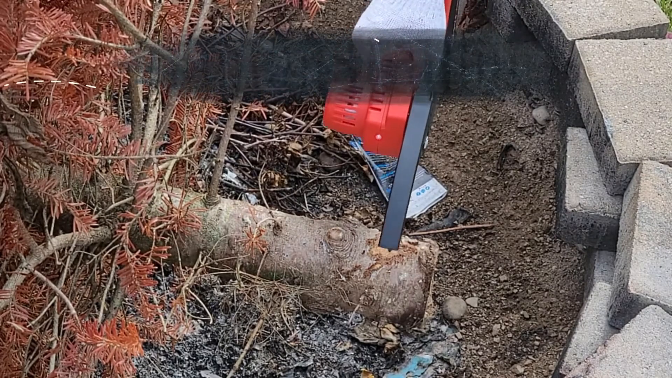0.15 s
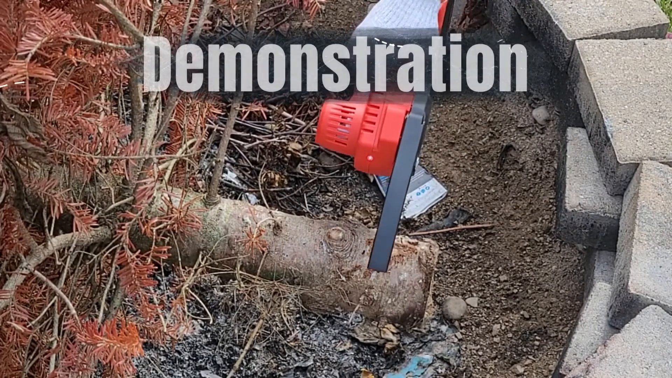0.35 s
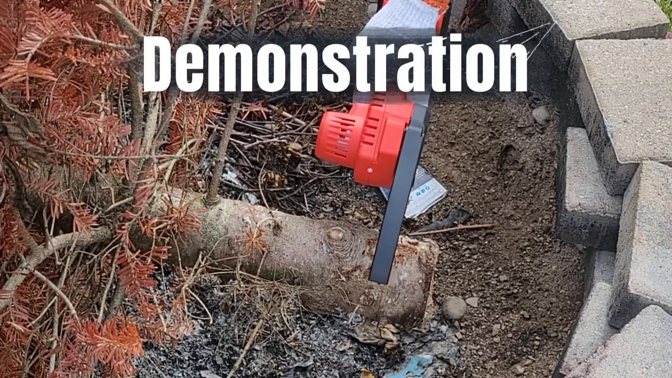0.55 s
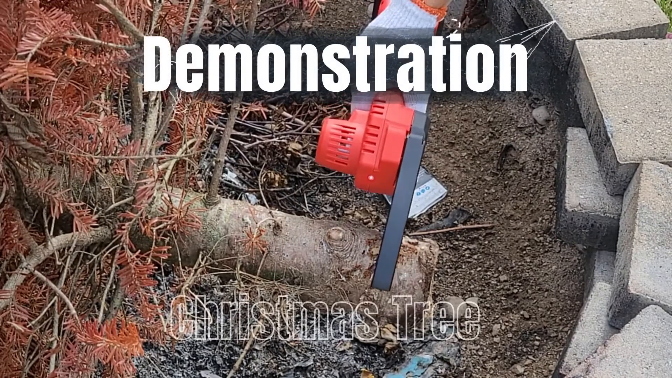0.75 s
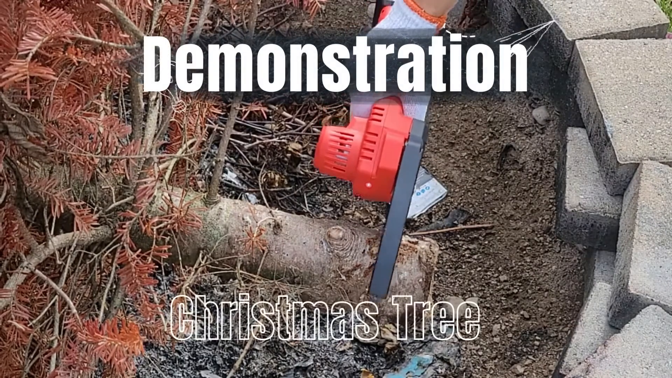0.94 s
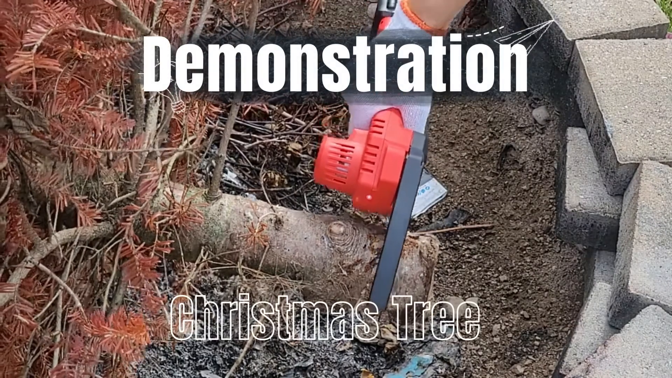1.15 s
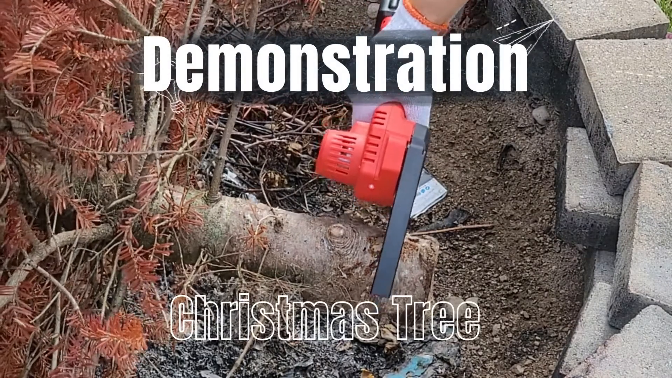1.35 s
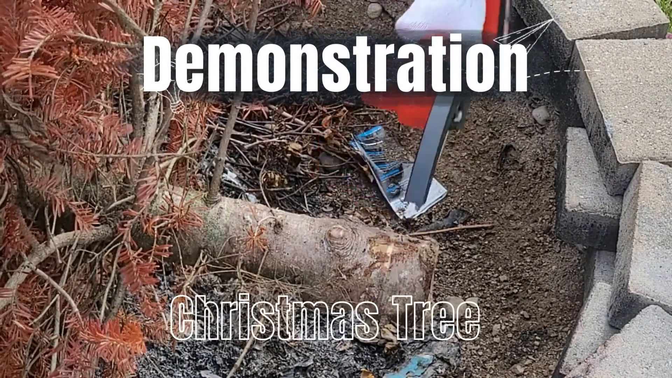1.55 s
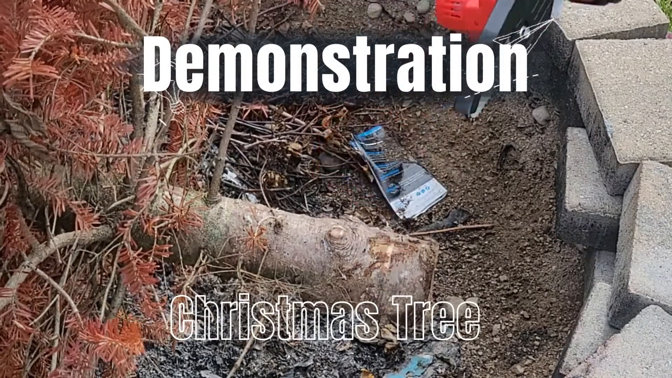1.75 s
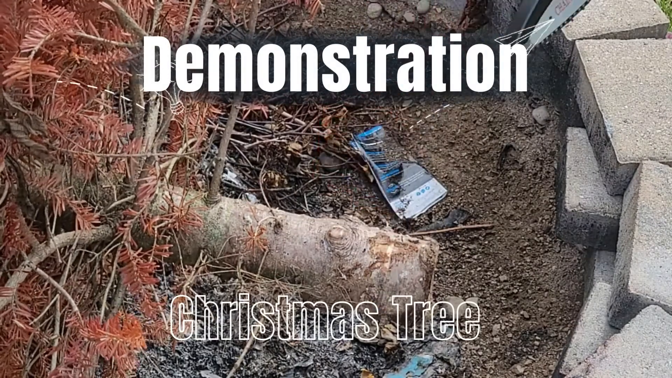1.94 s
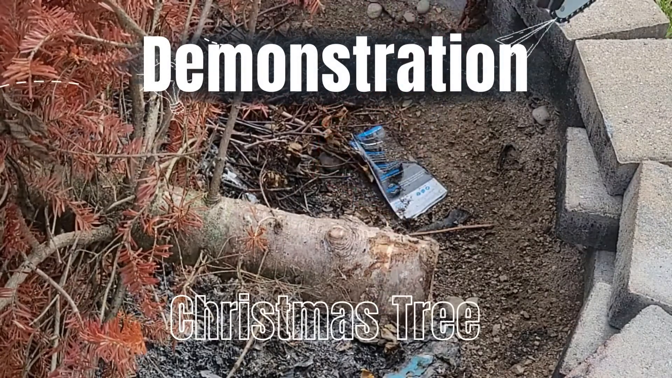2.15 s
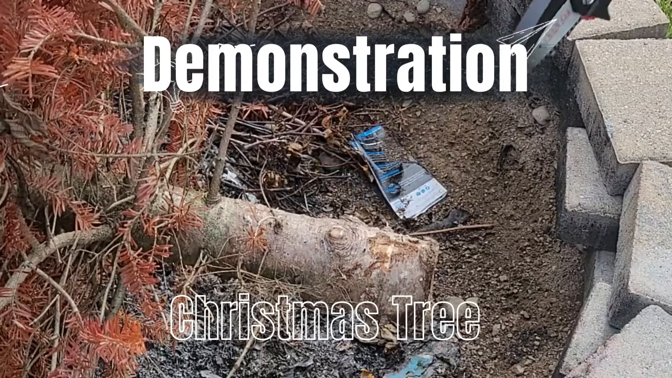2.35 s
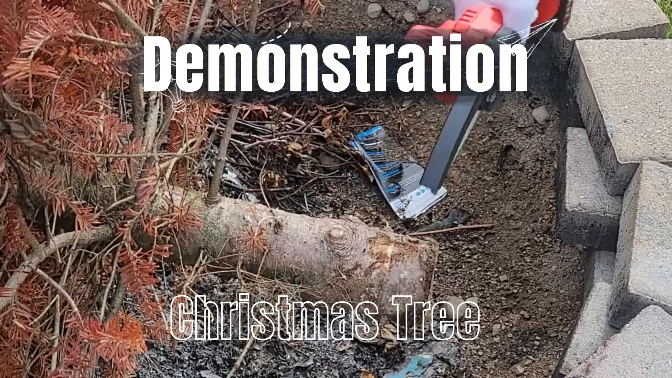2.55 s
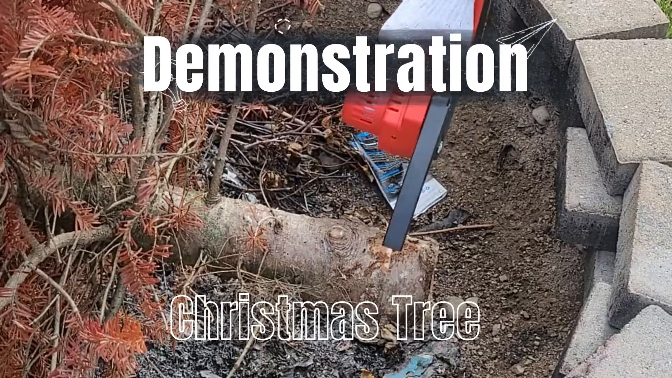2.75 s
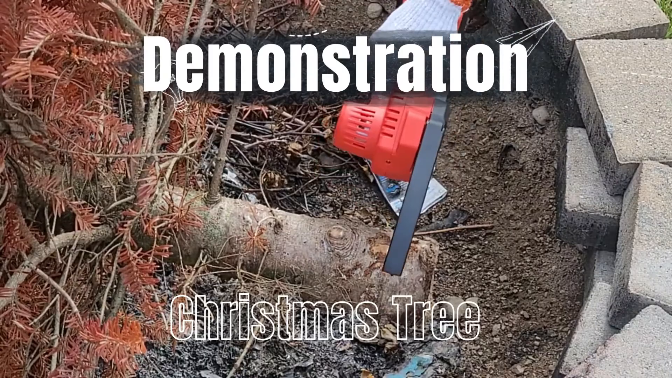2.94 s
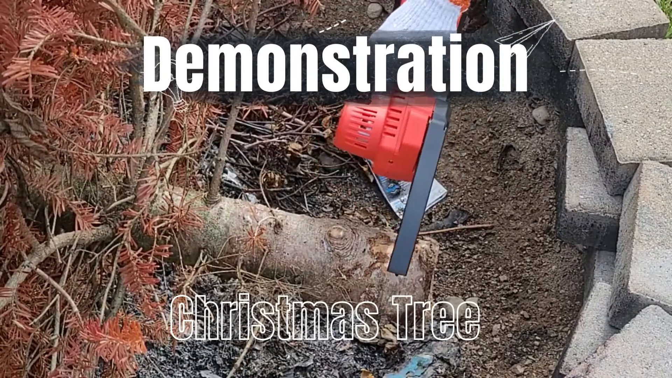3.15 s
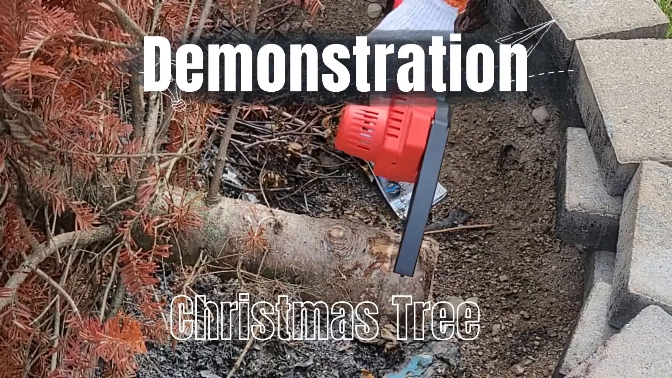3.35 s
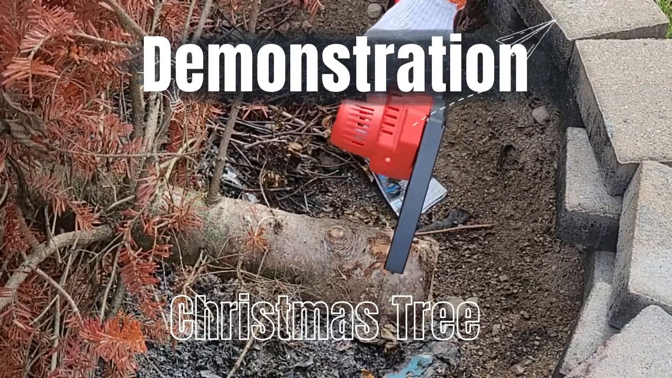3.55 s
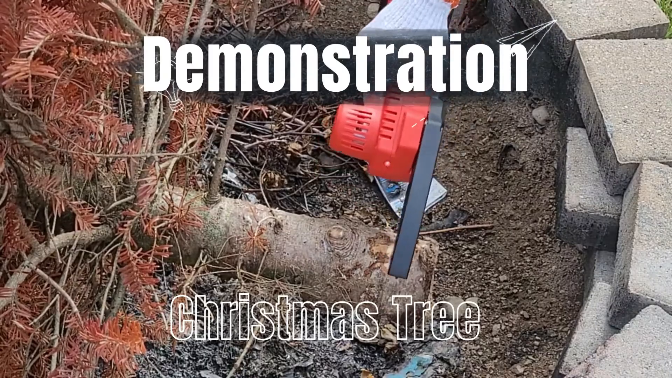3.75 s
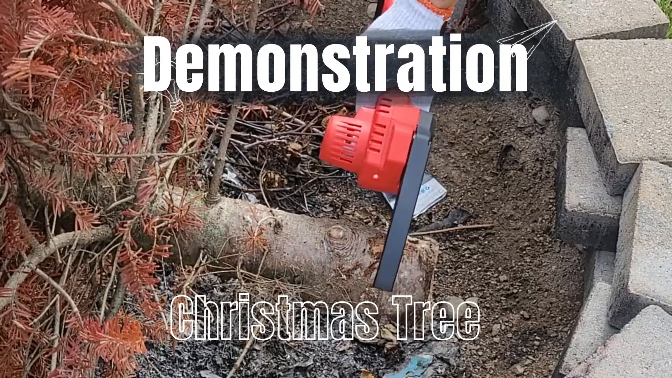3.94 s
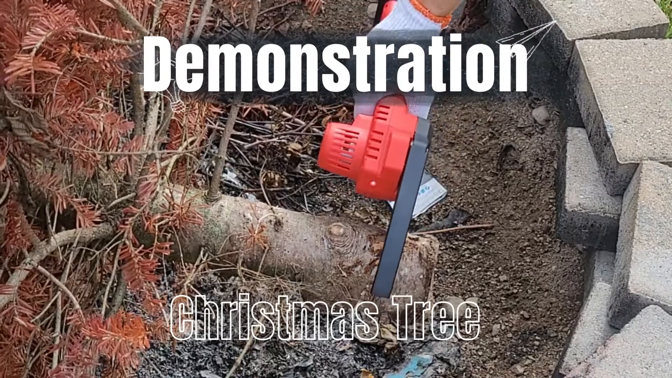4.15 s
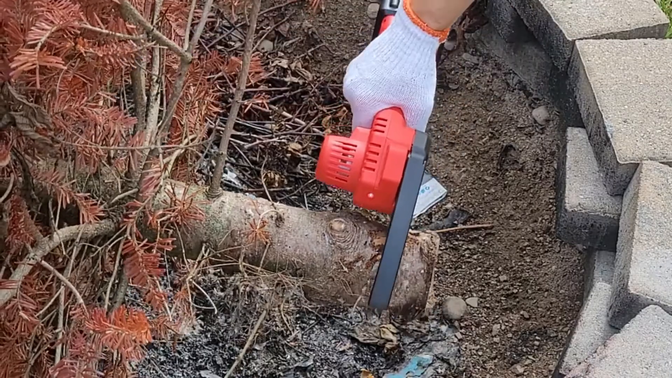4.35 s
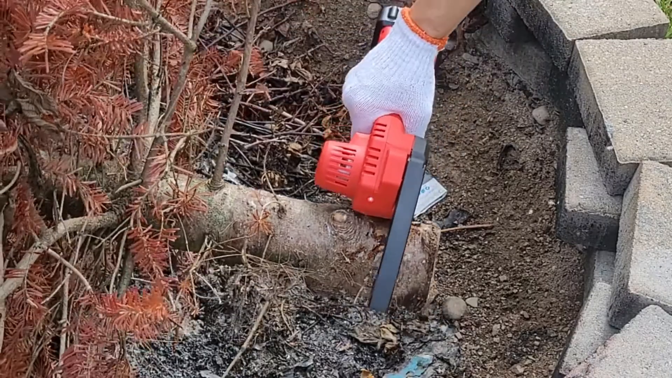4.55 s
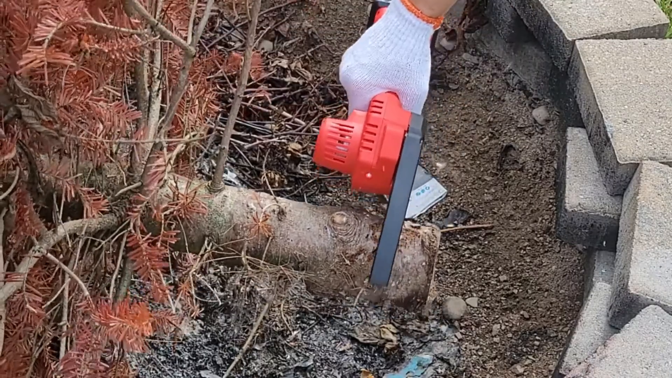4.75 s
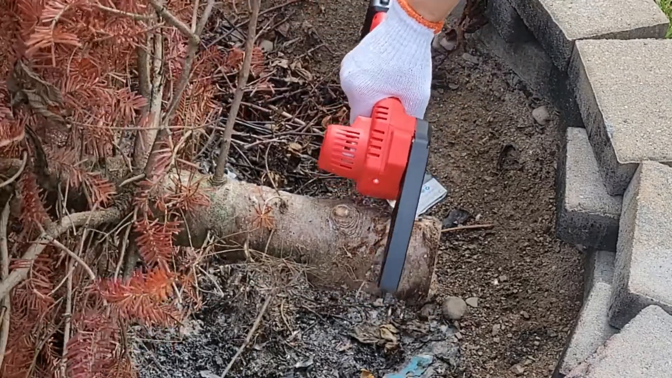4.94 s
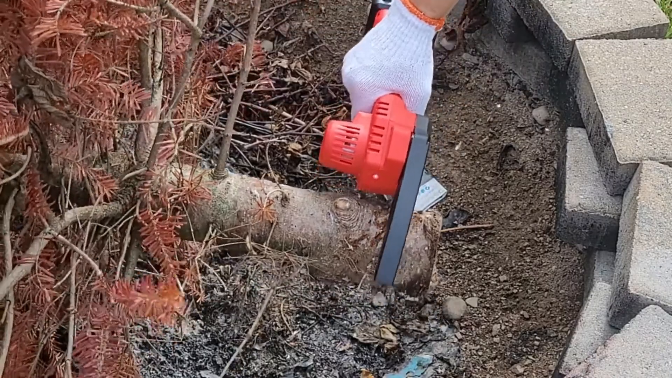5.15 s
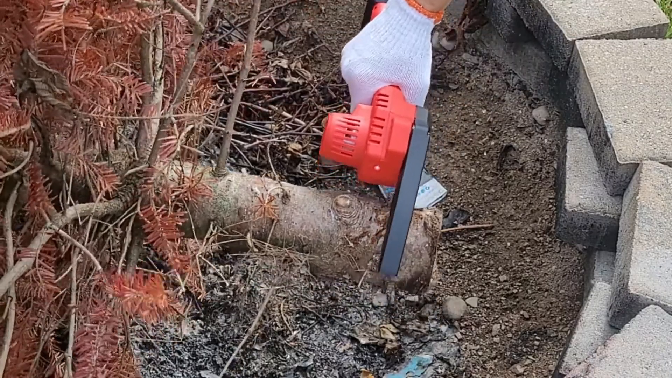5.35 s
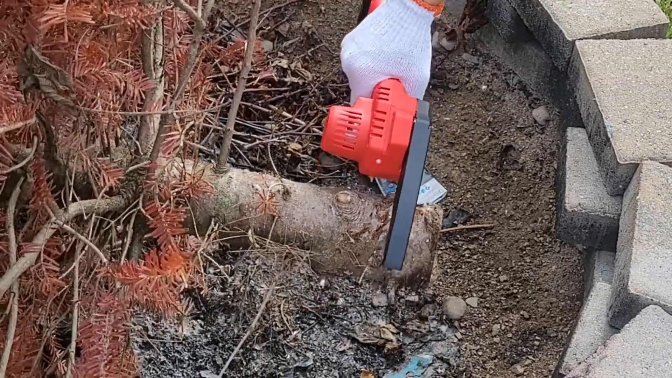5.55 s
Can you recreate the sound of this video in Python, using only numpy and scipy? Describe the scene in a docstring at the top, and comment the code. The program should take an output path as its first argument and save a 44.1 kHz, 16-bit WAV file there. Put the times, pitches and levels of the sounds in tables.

```python
"""A battery chainsaw, already running close by in a quiet garden, brushes the bark of a small dead trunk.
Its trigger is let go and the chain coasts to a stop: whine from sine tones, clatter and rattle from noise bursts.
In the pause bending sine whistles make birdsong, short noise bursts knock in the hand, the glove rubs,
and a far rumble of filtered noise swells once.
Then the chain spins up again and bites into the wood, rasping and sagging in pitch under the load."""
import sys
import numpy as np
from scipy import signal
from scipy.fft import rfft, irfft, next_fast_len
from scipy.io import wavfile
from scipy.ndimage import uniform_filter1d

SR = 44100
rng = np.random.default_rng(int(sys.argv[2]) if len(sys.argv) > 2 else 0)


def pcm_store(signal):
    """Save signal as 16-bit PCM."""
    levels = np.round(np.clip(np.atleast_2d(signal), -1, 1) * 32767)
    wavfile.write(sys.argv[1], SR, levels.astype(np.int16).T)


N = 246519

FREE_SPEED = 456.2   # the unloaded chain (links over the sprocket per s)
SPROCKET_TEETH = 7


def from_db(db):
    """Turn decibels into a gain."""
    return 10 ** (np.asarray(db) / 20)


def rms_one(x):
    """Scale to an average power of 1."""
    return x / np.sqrt(np.mean(x ** 2) + 1e-20)


def at_hz(points, hz):
    """Read a curve between its points, on a log-frequency axis."""
    point_hz, value = np.transpose(points)
    return np.interp(np.log(hz + 1e-3), np.log(point_hz), value)


def colour(x, gain_at):
    """Filter by a gain that depends on frequency."""
    size = next_fast_len(N + 4096)
    hz = np.arange(size // 2 + 1) * SR / size
    return irfft(rfft(x, size) * gain_at(hz), size)[..., :N]


def body(x, spectrum):
    """Shape a sound by an object's spectrum, which falls away beyond its ends; rms 1."""
    low, high = spectrum[0][0], spectrum[-1][0]

    def gain_at(hz):
        ends = np.minimum(hz / low, 1) ** 2 * np.minimum(high / (hz + 1), 1) ** 2
        return from_db(at_hz(spectrum, hz)) * ends

    return rms_one(colour(x, gain_at))


def drift(rate):
    """Slow random wandering with a spread of 1; a higher rate (Hz) wanders faster."""
    at = np.arange(N // 32 + 2) * 32   # drawn at every 32nd sample
    hz = np.arange(len(at) // 2 + 1) * SR / at[-1]
    smoothing = 1 / (1 + (hz / rate) ** 2)
    slow = irfft(rfft(rng.standard_normal(len(at))) * smoothing, len(at))
    return np.interp(np.arange(N), at, rms_one(slow))


def swell(middle_s, width_s):
    """A smooth rise and fall of height 1."""
    return np.exp(-((np.arange(N) / SR - middle_s) / width_s) ** 2)


def add(track, s, sound):
    """Mix a sound into a track at a time in seconds."""
    start = round(s * SR)
    track[..., start:start + sound.shape[-1]] += sound[..., :N - start]


def garden(x, t60):
    """Dying scatter from walls, fences and leaves, different on each side."""
    t = np.arange(SR // 2) / SR
    echoes = rng.standard_normal((2, len(t))) * from_db(-60 * t / t60)
    echoes /= np.linalg.norm(echoes, axis=1, keepdims=True)
    return signal.fftconvolve(np.atleast_2d(x), echoes, axes=1)[:, :N]


def two_ports(mid, side):
    """Parts of the saw radiate differently to each side, so left and right are less alike in some bands."""
    # how alike left and right are: hz, likeness (0-1)
    likeness = [(300, 0.95), (700, .95), (1400, .85), (3000, 0.77), (5000, 1), (6500, 0.1), (7800, 0),
                (9500, 0.6), (15000, .55)]

    def side_gain(hz):
        alike = np.clip(at_hz(likeness, hz), 0, 1)
        return np.sqrt((1 - alike) / (1 + alike))

    return mid + colour(side, side_gain) * [[1], [-1]]


def air():
    """Distant traffic as a low rumble, alike on both sides, with a faint diffuse hiss of still air."""
    # distant traffic and still air: hz, relative level (dB per Hz)
    air_spectrum = [(15, -34.5), (25, -8.5), (59, 1), (91, -1.5), (136, -6.5), (178, -20), (260, -18),
                    (313, -21), (1050, -35), (2770, -30), (4040, -30.5), (6730, -44.5), (7910, -52.5),
                    (9300, -40), (15500, -56)]
    mid, side = body(rng.standard_normal((2, N)), air_spectrum)
    side = colour(side, lambda hz: from_db(at_hz([(100, -15.5), (400, -8), (2000, 2)], hz)))
    still = mid + side * [[1], [-1]]
    rumble = colour(still, lambda hz: 1 / (1 + (hz / 700) ** 2))
    hiss = still - rumble
    rumble_db = -57 + 4 * swell(2.65, 0.49)   # the far rumble swells once
    return from_db(rumble_db + 1.2 * drift(5)) * rumble + from_db(-56.0) * hiss


def whistle(length, pitches_hz, db, waver):
    """A near sine that bends through three pitches, wavers a little and swells in the middle."""
    u = np.linspace(0, 1, int(length * SR))
    tremble = rms_one(uniform_filter1d(rng.standard_normal(SR // 2), size=60))[:len(u)]
    bend = np.polyfit([0, .5, 1], pitches_hz, 2)
    hz = np.polyval(bend, u) * (1 + waver * tremble)
    loudness = np.sqrt(2) * from_db(db) * np.sin(np.pi * u)
    return loudness * np.sin(2 * np.pi * np.cumsum(hz) / SR)


def birds(direct_db, echo_db, waver, lag_s):
    """Far whistles from the right, blurred by the garden, and nearer chips with a brief scatter."""
    # bird notes: start_s, length_s, start_hz, middle_hz, end_hz, level_db (before the mix)
    song_notes = [(1.743, .06, 1960, 2020, 1600, -62), (2.004, .094, 1830, 2085, 2050, -58),
                  (2.037, .11, 3050, 3350, 3150, -66), (2.077, 0.11, 2810, 2690, 2640, -64),
                  (2.525, 0.17, 5750, 5860, 5780, -63), (2.6, 0.172, 2760, 2560, 2600, -69),
                  (2.763, 0.063, 2010, 2600, 3300, -56), (2.803, 0.052, 3120, 3800, 4700, -49),
                  (2.832, 0.042, 1750, 2000, 2200, -57), (2.871, 0.029, 5400, 4080, 3200, -51),
                  (2.86, .05, 5300, 6450, 5800, -70), (2.867, 0.036, 2500, 2910, 3280, -57),
                  (2.94, 0.03, 4000, 3200, 2580, -59), (2.988, .06, 3180, 3800, 4400, -62.5),
                  (3.12, 0.054, 3200, 3800, 4470, -66), (3.174, 0.069, 2540, 2360, 1650, -65),
                  (3.27, .035, 2700, 2150, 1550, -71), (3.445, 0.026, 3400, 4300, 5200, -63),
                  (3.47, .022, 5400, 4720, 3900, -58), (3.492, 0.079, 2690, 3480, 5040, -55.5)]
    # a small bird's thin, high chips: start_s, level_db (before the mix)
    chip_notes = [(1.75, -58), (1.894, -67), (2.038, -68), (2.19, -66.5), (2.435, -63), (2.584, -55),
                  (3.017, -59), (3.148, -66), (3.292, -64), (3.445, -63)]
    # its softer, longer and lower notes: start_s, level_db (before the mix)
    seep_notes = [(2.052, -79), (2.61, -73.5), (2.8, -72), (2.99, -76)]
    chip_s, chip_hz = .022, 9740
    seep_s, seep_hz = 0.053, 9300
    rise_hz = 450   # each chip or seep rises by this much
    twitters_per_s, twitter_hz, twitter_s, twitter_db = 3.3, 2750, 0.03, -68.5

    song, chips = np.zeros((2, N))
    for s, length, *pitches_hz, db in song_notes:
        add(song, s, whistle(length, pitches_hz, db, waver))
    # faint birds twitter at random behind them
    for when, pitch, glide in rng.uniform(-1, 1, (int(twitters_per_s * N / SR), 3)):
        octaves = .5 * pitch + .25 * glide * np.array([-1, 0, 1])
        add(song, abs(when) * N / SR, whistle(twitter_s, twitter_hz * 2 ** octaves, twitter_db, waver))
    for notes, length, hz in (chip_notes, chip_s, chip_hz), (seep_notes, seep_s, seep_hz):
        for s, db in notes:
            add(chips, s, whistle(length, hz + rise_hz * np.array([-.5, 0, .5]), db, waver=0.014))
    # the song reaches the left side slightly later
    direct = np.stack([np.roll(song, int(lag_s * SR)), song])
    blur, scatter = garden(song, t60=.3), garden(chips, t60=.1)
    near = from_db(-1) * (chips + from_db(3.5) * scatter)
    return from_db(direct_db) * direct + from_db(echo_db) * blur + near


def handling():
    """Saw and twigs knock as the grip shifts, each a noise burst in one band, amid the rub of the glove."""
    # knocks: start_s, level_db (peak, before a 1 dB lift), centre_hz, width_octaves, t60_s (time to fall 60 dB)
    knock_rows = [(2.252, -50, 560, 0.67, 0.038), (2.31, -55, 1290, 0.91, .06),
                  (2.387, -45.5, 2390, 1.8, 0.11), (2.411, -35.5, 7000, 3.5, 0.017),
                  (2.484, -58, 800, 1.4, .06), (2.54, -39, 9700, 0.48, 0.01), (3.11, -50, 650, 2.1, 0.058),
                  (3.11, -47, 1170, 0.33, 0.021)]
    # the glove rubs on the handle: middle_s, half_length_s, level_db
    rub_rows = [(2.29, 0.068, -67.5), (2.516, 0.13, -67)]
    # cloth on plastic: hz, relative level (dB per Hz)
    cloth = [(300, 10), (700, 8), (1500, -7), (3000, -2), (5500, 3), (7500, -13), (9200, 11), (12000, 0),
             (15500, -3)]
    knocks, t = np.zeros(N), np.arange(SR // 8) / SR
    for s, db, hz, octaves, t60 in knock_rows:
        edges_hz = hz * 2 ** (octaves * np.array([-.5, .5]))
        band = signal.butter(2, np.minimum(edges_hz, .45 * SR), "band", fs=SR, output="sos")
        burst = rng.standard_normal(len(t)) * from_db(-60 * t / t60)
        knock = signal.sosfilt(band, burst)
        add(knocks, s, from_db(db + 1.0) * knock / np.abs(knock).max())
    rub = sum(from_db(db) * swell(s, half_length) for s, half_length, db in rub_rows)
    rubbing = two_ports(*body(rng.standard_normal((2, N)), cloth))
    return knocks + rub * from_db(2.1 * drift(40)) * rubbing


def drive(load):
    """The motor runs the chain up quickly, sags under load and coasts down evenly when let go."""
    # the trigger is held twice: pressed_s, released_s
    trigger = [(-0.17, 1.415), (3.591, 6)]
    sag = 42   # speed lost at full load (links per s)
    spin_up_s, coast_loss = .044, 1340   # run-up time constant; slowing (links per s, each second)
    start_tension = 1.5   # pull of the starting motor on the chain (full loads)
    whip_s = 0.3   # after each start the chain whips, then settles
    t = np.arange(N) / SR
    speed, tension, whip = np.zeros((3, N))
    for pressed, released in trigger:
        age = np.maximum(t - pressed, 0)
        to_go = np.exp(-age / spin_up_s)
        driven = (FREE_SPEED - sag * load) * (1 - to_go)
        speed += np.maximum(driven - coast_loss * np.maximum(t - released, 0), 0)
        tension += start_tension * to_go * (t > pressed)
        whip += (1 - to_go) * np.exp(-(age / whip_s) ** 2)
    return speed, load + tension, whip


def impacts(links, loop_db, tooth_db, chance_db, scatter, decay_s, own, meshing, friction):
    """One noise burst per count of links; 28 link and 7 tooth patterns return in turn; rms near 1."""
    loop_links = 28
    count, t = int(links[-1]), np.arange(SR // 100) / SR
    link_chatter = rng.standard_normal((loop_links, 2, len(t)))
    tooth_chatter = rng.standard_normal((SPROCKET_TEETH, 2, len(t)))
    wear = rms_one(np.diff(rng.standard_normal(loop_links + 1)))   # a tight link leaves its neighbour slack
    sliding = rng.standard_normal((2, N))
    chance, late = rng.standard_normal((count, 2)).T
    k = np.arange(count)
    strength_db = loop_db * wear[k % loop_links]
    strength_db += tooth_db * np.cos(2 * np.pi * k / SPROCKET_TEETH)
    strength_db += chance_db * chance.clip(-2, 2)
    strength = from_db(strength_db)
    at = np.searchsorted(links, k + scatter * late).clip(0, N - 1)
    out = np.zeros((2, N))
    fade = np.exp(-t / decay_s) * (1 - np.exp(-t / 0.00039))   # the ringing spreads through the saw, then dies
    for i in k:
        chatter = own * link_chatter[i % loop_links] + meshing * tooth_chatter[i % SPROCKET_TEETH]
        chatter = chatter + rng.standard_normal((2, len(t)))
        add(out, at[i] / SR, strength[i] * fade * chatter)
    pace = np.gradient(links)
    out = rms_one(out * pace) + friction * sliding   # a slow chain strikes softly and mostly slides
    return out / np.sqrt(uniform_filter1d(out[0] ** 2, size=2200) + 1e-6)   # evens out the level


def rattle(blows, spectrum):
    """The blows ring an object, heard differently on each side."""
    return two_ports(*body(blows, spectrum))


def bar_ring(blows, whip, width_hz, wander_hz):
    """The guide bar's resonance wanders with grip and contact, and rises as the chain settles; rms 1."""
    bar_hz, slack_hz = 2593, 140   # centre; how much lower the whipping chain strikes it
    hz = bar_hz - slack_hz * whip + wander_hz * drift(14)
    turn = np.exp(2j * np.pi * np.cumsum(hz) / SR)
    # shift the resonance down to 0 Hz, keep a narrow band, shift it back
    narrow = signal.butter(2, width_hz / 2, fs=SR, output="sos")
    return rms_one((signal.sosfilt(narrow, blows / turn) * turn).real)


def ground_bounce(x, delay_s, gain, sway):
    """A reflection off the soil and the stone edging, whose path changes as the hand moves."""
    n = np.arange(N)
    echo = [np.interp(n - delay_s * SR * (1 + sway * drift(1.0)), n, side) for side in x]
    return (x + gain * np.array(echo)) / np.sqrt(1 + gain ** 2)


def snags(bite, db, lumpy_db):
    """Deep in the cut the trunk throbs dully, and thuds when a cutter catches."""
    # a cutter catches in the wood: middle_s, level_db
    catches = [(1.19, -44), (1.35, -45), (4.36, -39), (4.56, -34), (4.62, -35), (4.94, -46), (5.12, -47.5),
               (5.53, -39.5)]
    catch_s = 0.015
    thud = body(rng.standard_normal(N), [(110, -2), (200, 0.5), (330, 5.5), (450, -5.5)])
    throb = bite ** 3 * from_db(db) * rms_one(from_db(lumpy_db * drift(25).clip(-2, 2)))
    caught = sum(from_db(level_db) * swell(s, catch_s) for s, level_db in catches)
    return thud * (throb + caught)


def whine(links, pace, tension, bite, flutter_db, loaded_flutter_db):
    """Links lift and drop on the sprocket over motor tones; in the cut they snatch, and the wood damps them."""
    # partials of the whine, whose cutters repeat every four links:
    # cycles per four links, level_db (against the overtone level)
    orders = [(3, -22.5), (5, -17), (7, -16.5), (8, 1.5), (9, -9.5), (10, -18.5), (11, -14), (12, -6.5),
              (13, -24.5), (15, -27), (16, -12), (22, -7)]
    # the motor behind its reduction gear: cycles per motor turn, level_db (against the overtone level)
    motor = [(1, -14.5), (6, -12), (7, -15.5), (10, -13.5)]
    cutter_links, motor_turns_per_link = 4, .8512
    # level at free speed (dB), power of pace, change at full bite (dB)
    whine_db, whine_power, whine_load_db = -25, 6.2, -2
    # the overtones fade as the chain is pulled tight: the last is the change at a tension of 1 (dB)
    overtone_db, overtone_power, overtone_tension_db = -28.5, 1.4, -18
    # play of the chain (links), and how much more it snatches away from free speed
    slack, off_speed_snatch = .026, 2.5

    snatch = slack * (0.6 + bite + off_speed_snatch * (1 - pace)) * drift(45)
    phase = 2 * np.pi * (links + snatch)
    flutter = (flutter_db + loaded_flutter_db * bite) * drift(50)
    tone = np.sin(phase) * pace ** whine_power * from_db(whine_db + whine_load_db * bite + flutter)
    overtones = pace ** overtone_power * from_db(overtone_db + overtone_tension_db * tension)
    partials = [(order / cutter_links, db) for order, db in orders]
    partials += [(order * motor_turns_per_link, db) for order, db in motor]
    for per_link, db in partials:
        wave = np.sin(per_link * phase + rng.uniform(0, 2 * np.pi))
        tone += overtones * from_db(db + 2.0 * drift(11)) * wave
    wobble = 1 + 0.028 * np.sin(phase / SPROCKET_TEETH)   # the sprocket runs slightly off centre
    fade_in = np.minimum(links / 3, 1)   # over the first three links
    small_body = signal.butter(4, 310, "high", fs=SR, output="sos")   # too small to radiate bass
    return signal.sosfilt(small_body, np.sqrt(2) * tone * wobble * fade_in)


def saw():
    """Trigger and load set the chain speed, which drives whine, housing clatter, steel rattle and rasp."""
    # how hard the bar presses on the bark, then into the trunk: time_s, load (0-1)
    load_rows = [(0.15, .06), (0.85, .04), (1.08, .11), (1.2, .39), (1.41, .44), (1.7, .08), (3.59, 0),
                 (4.13, 0), (4.22, .17), (4.36, .34), (4.52, .75), (4.67, .64), (4.77, .36), (4.93, 1),
                 (5.02, .66), (5.11, .77), (5.4, .86), (5.59, .78)]
    # the plastic housing, struck by the chain: hz, relative level (dB per Hz)
    housing_spectrum = [(200, -34), (290, -28.5), (370, -9.5), (540, -4), (660, -15.5), (850, -7.5),
                        (1100, -7), (1300, -2.5), (1600, -13.5), (2100, -1), (2550, 0), (3100, -5),
                        (3900, -3), (5700, -22.5)]
    # links and bar ringing: hz, relative level (dB per Hz)
    steel_spectrum = [(3500, -42), (5000, -14), (5700, -21), (6800, -14), (8000, -11), (8600, -7),
                      (9100, -1.5), (10000, -2), (10800, -0.5), (11700, -4), (12300, -3), (13200, -5),
                      (14300, -13), (15800, -12)]
    # the trunk under the cutters: hz, relative level (dB per Hz)
    wood_spectrum = [(60, -29.5), (160, -18.5), (260, -16), (350, -3), (520, 0), (650, -2.5), (900, -5.5),
                     (1270, 6.5), (1450, -2.5), (1650, 1.5), (1850, -14), (2800, -7), (5000, -8),
                     (7000, -19.5)]
    # left minus right: hz, level_db
    balance = [(400, 0.5), (850, -3.5), (1300, 0), (2500, -1), (4000, 0), (7000, -0.5), (7900, -8.5),
               (9500, 1), (11000, -3.5), (12500, 4.5), (15500, 1.5)]
    bite_power = 0.6   # the cutters' bite grows as this power of the load
    # levels before slap and whip (dB), and the powers of pace that they follow
    housing_db, housing_power, bar_db = -21.5, 0.42, -27.5
    steel_db, steel_power, steel_load_db = -11.5, 0.36, 0.5
    wood_db = -23   # the rasp at full bite and free speed
    # below these speeds the chain mostly slides, and its links stop jumping (links per s)
    slide_speed, rattle_speed = 100, 194
    # the whipping chain strikes the housing harder, and the bar harder still (dB)
    whip_db, bar_whip_db = 2.5, 1

    load = np.interp(np.arange(N) / SR, *np.transpose(load_rows))
    speed, tension, whip = drive(load)
    pace, bite = speed / FREE_SPEED, load ** bite_power
    links = np.cumsum(speed) / SR
    striking = speed ** 2 / (speed ** 2 + slide_speed ** 2)
    clatter = from_db(whip_db * whip) * pace ** housing_power * striking
    jumping = pace ** steel_power * speed ** 2 / (speed ** 2 + rattle_speed ** 2)
    slap = from_db(0.98 * drift(25))   # the loose chain slaps along the bar

    seating = impacts(links, loop_db=0.5, tooth_db=0.5, chance_db=0.0, scatter=.01,
                      decay_s=0.0016, own=1.1, meshing=0.35, friction=0.22)
    jingle = impacts(links, loop_db=0.85, tooth_db=0.4, chance_db=0.2, scatter=.008,
                     decay_s=0.0014, own=.85, meshing=0.17, friction=0.55)
    # a cutter rides on every other link
    cutting = impacts(links / 2, loop_db=2.0, tooth_db=1.0, chance_db=2.5, scatter=.1,
                      decay_s=0.0024, own=0.13, meshing=0.035, friction=0.37)

    housing = clatter * from_db(housing_db) * rattle(seating, housing_spectrum)
    ring = bar_ring(seating[1], whip, width_hz=170, wander_hz=130)
    bar = clatter * from_db(bar_db + bar_whip_db * whip) * ring
    bounced = ground_bounce(rattle(jingle, steel_spectrum), delay_s=0.0013, gain=0.5, sway=0.06)
    steel = jumping * from_db(steel_db + steel_load_db * load) * bounced
    rasp = bite * clatter * from_db(wood_db) * rattle(cutting, wood_spectrum)
    wood = rasp + snags(bite * pace, db=-45, lumpy_db=6.0)
    tones = whine(links, pace, tension, bite, flutter_db=-0.23, loaded_flutter_db=3.0)
    sound = slap * (housing + bar) + slap ** 0.53 * steel + wood + tones
    sound = sound + from_db(-23.5) * garden(sound, t60=0.34)
    # half of the balance goes to each side
    return colour(sound, lambda hz: from_db(at_hz(balance, hz) * np.array([[.5], [-.5]])))


def scene():
    """The saw in front of the quiet garden."""
    background = air() + birds(direct_db=-1, echo_db=-2, waver=0.0065, lag_s=.00047)
    return background + handling() + saw()


def record(dry):
    """The highest peaks are rounded just under full scale and the top treble is cut."""
    cutoff_hz = 15800
    rounded = dry / (1 + np.abs(dry) ** 8) ** (1 / 8)
    return colour(rounded, lambda hz: from_db(-np.clip((hz - cutoff_hz) / 4, 0, 90)))


dry = scene()
out = record(dry)
pcm_store(out)
```